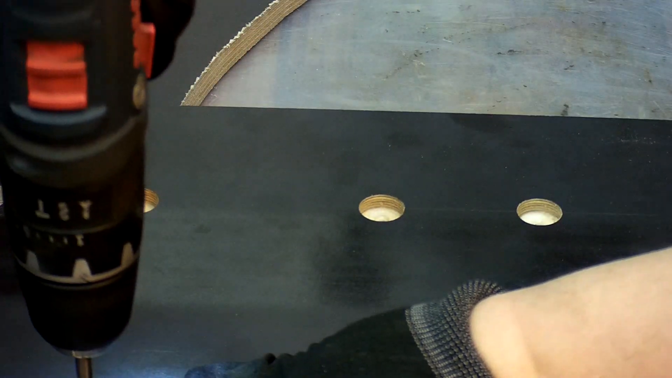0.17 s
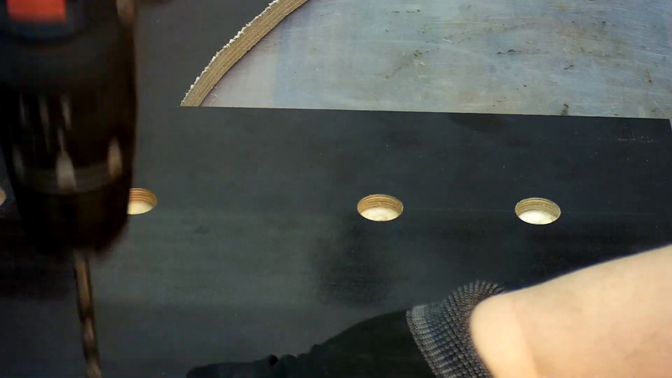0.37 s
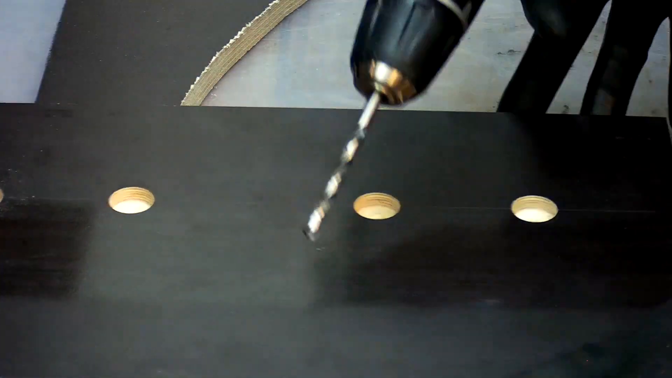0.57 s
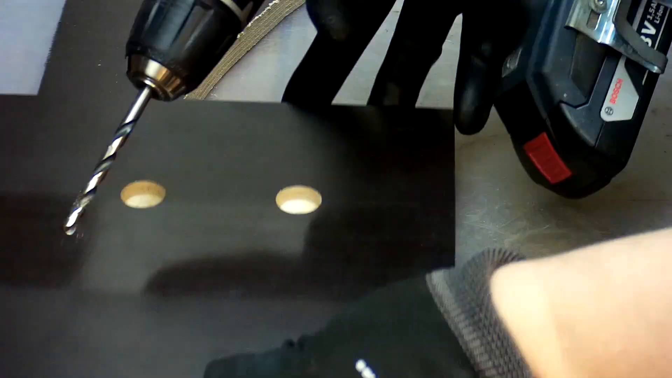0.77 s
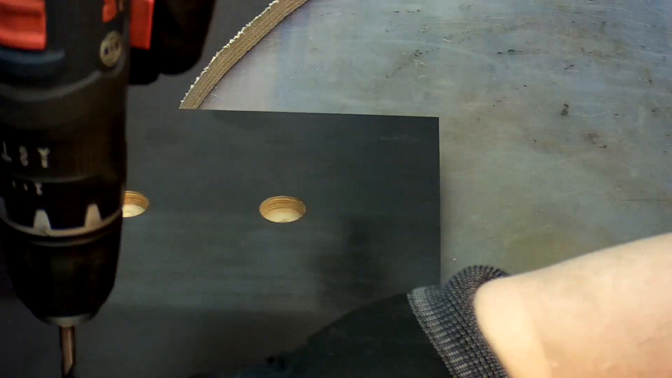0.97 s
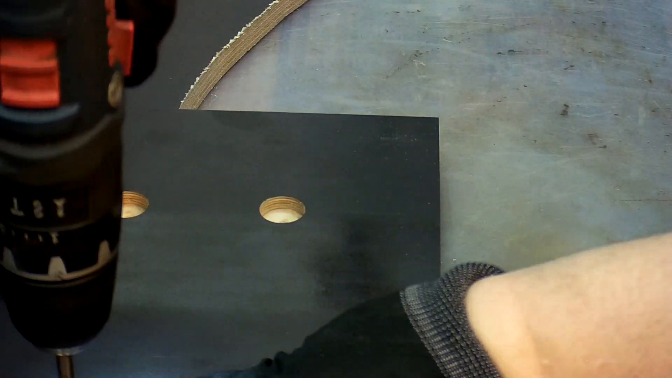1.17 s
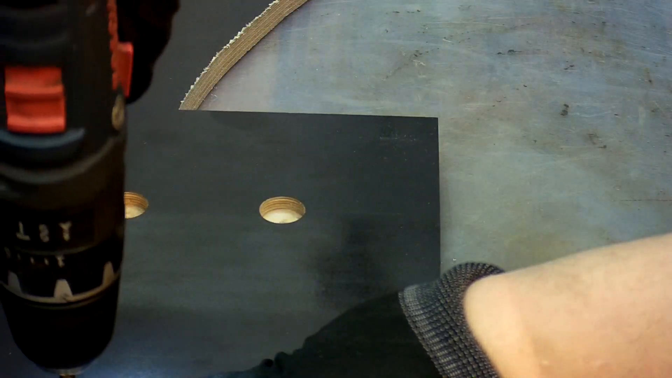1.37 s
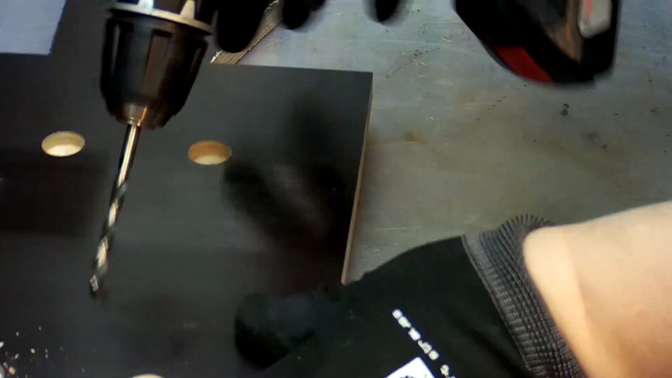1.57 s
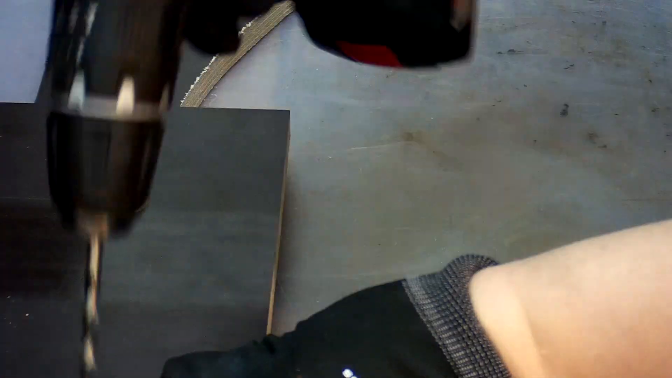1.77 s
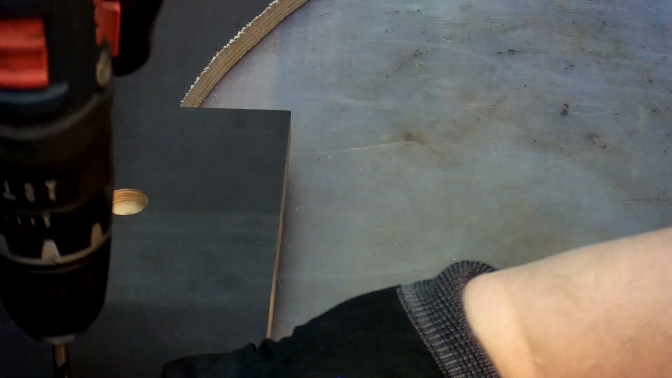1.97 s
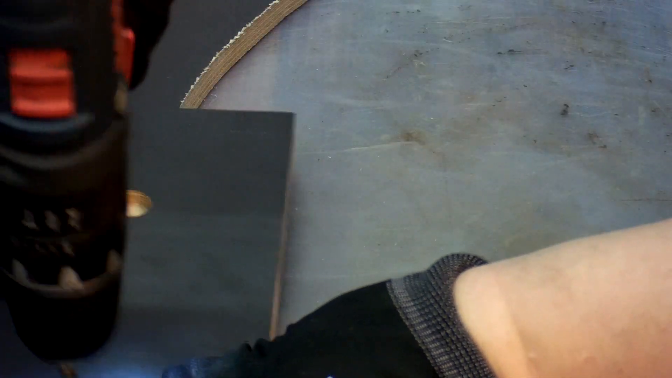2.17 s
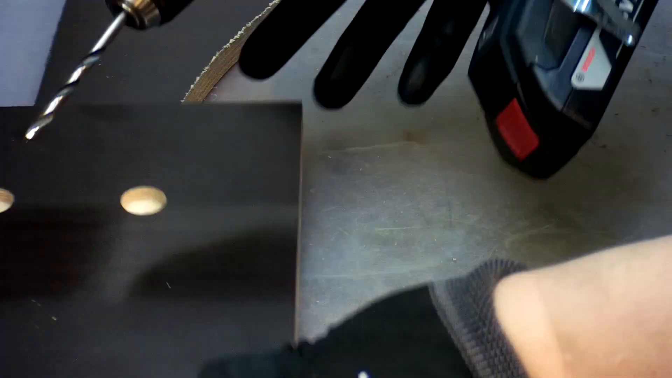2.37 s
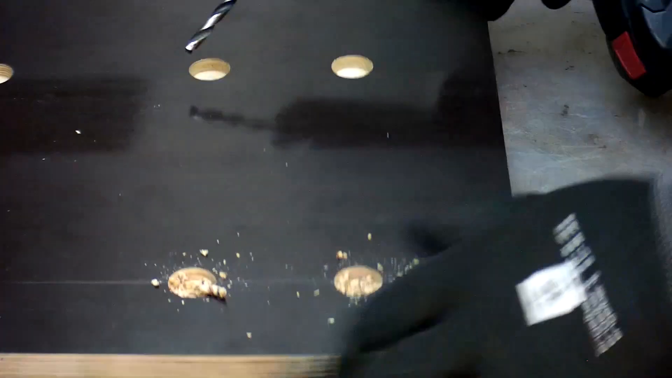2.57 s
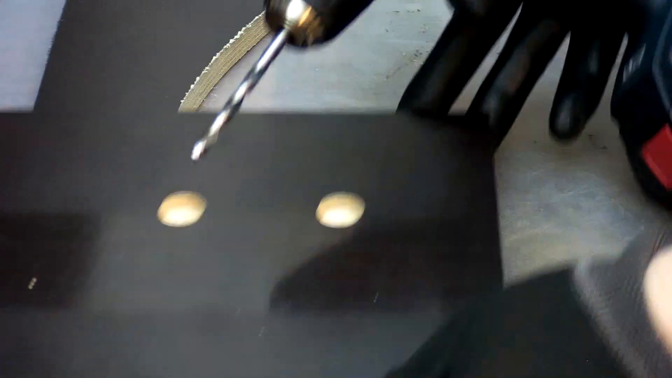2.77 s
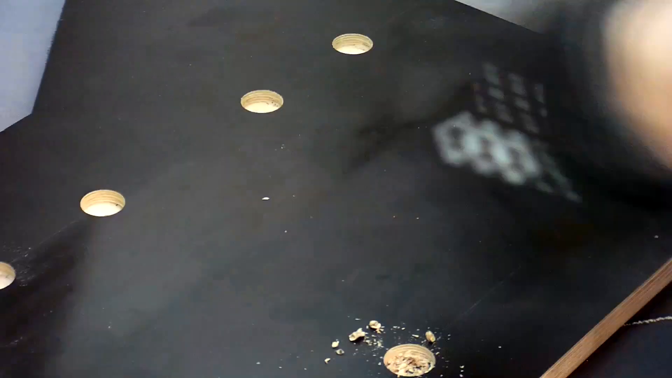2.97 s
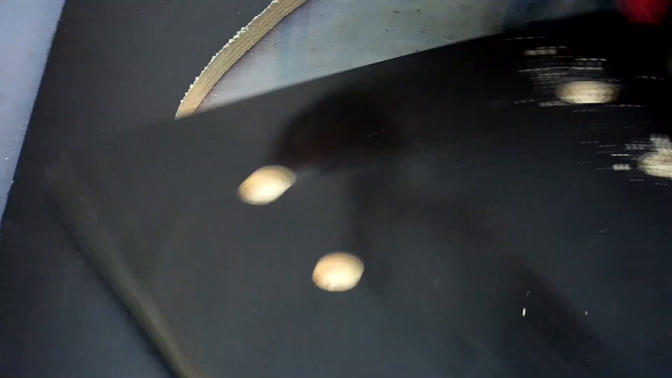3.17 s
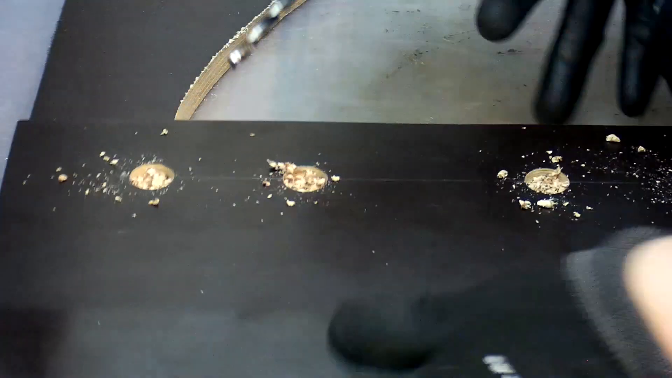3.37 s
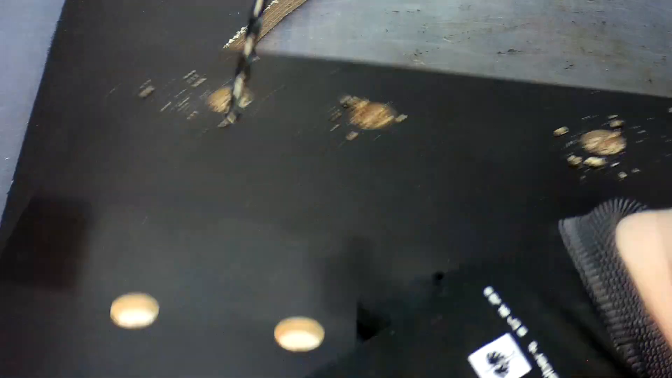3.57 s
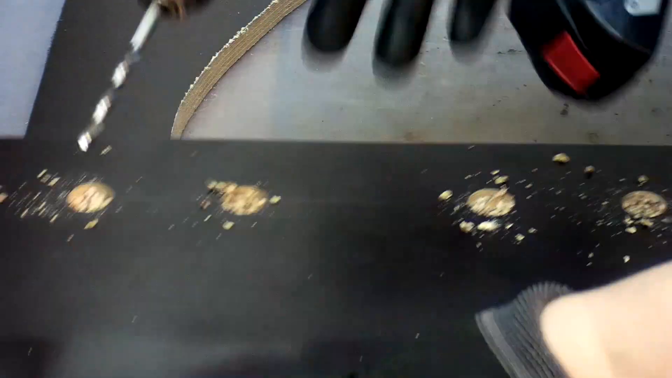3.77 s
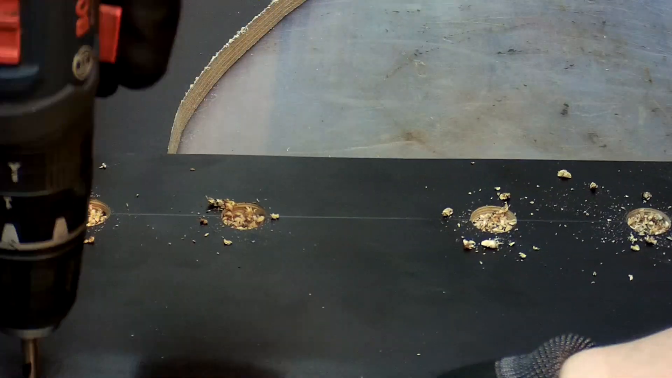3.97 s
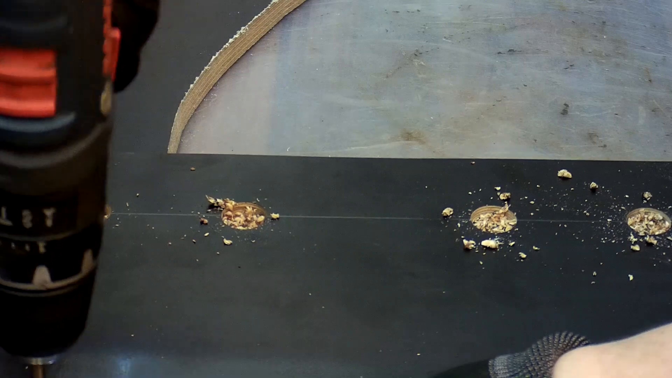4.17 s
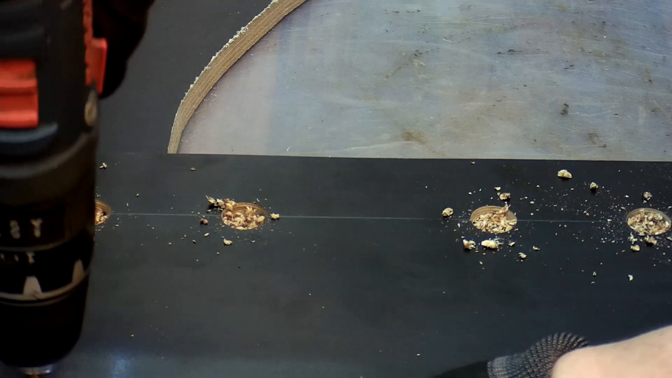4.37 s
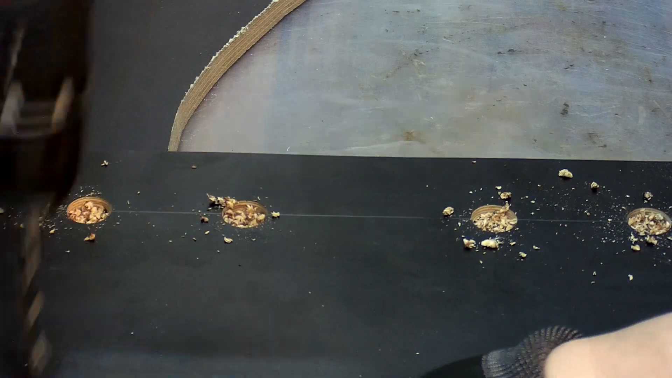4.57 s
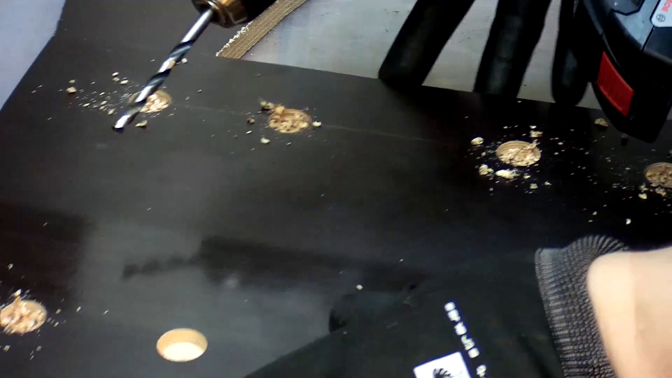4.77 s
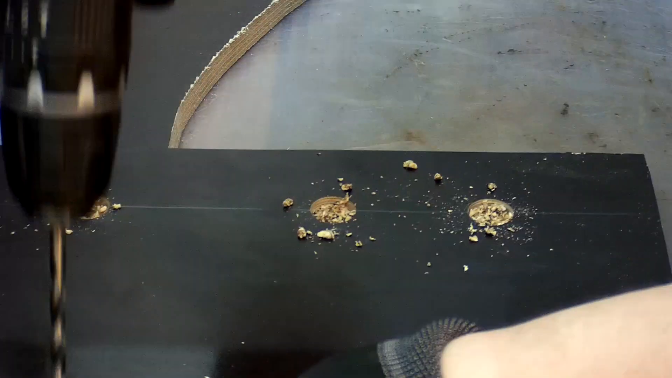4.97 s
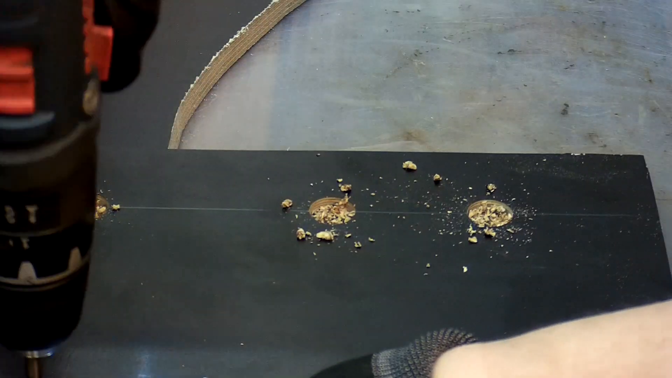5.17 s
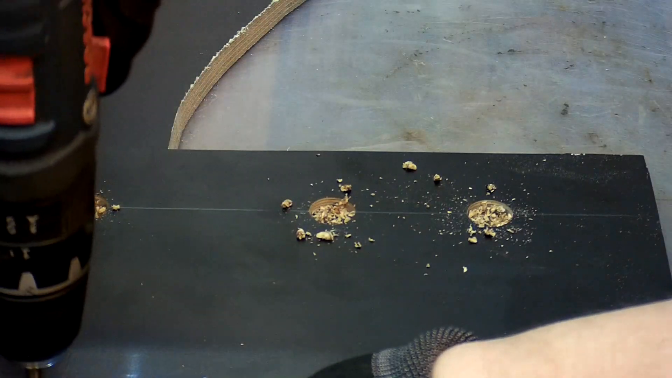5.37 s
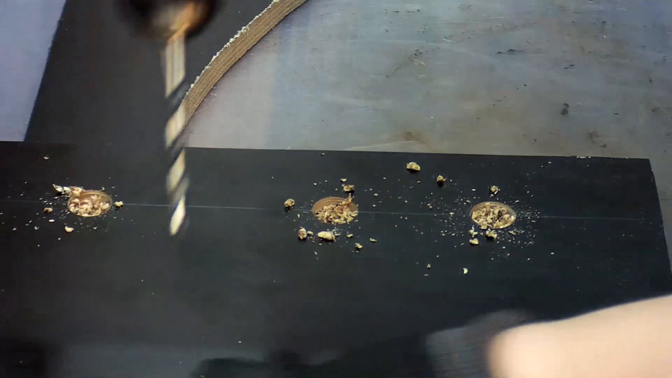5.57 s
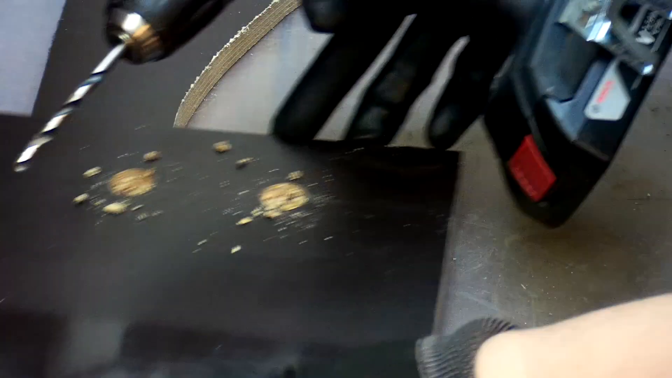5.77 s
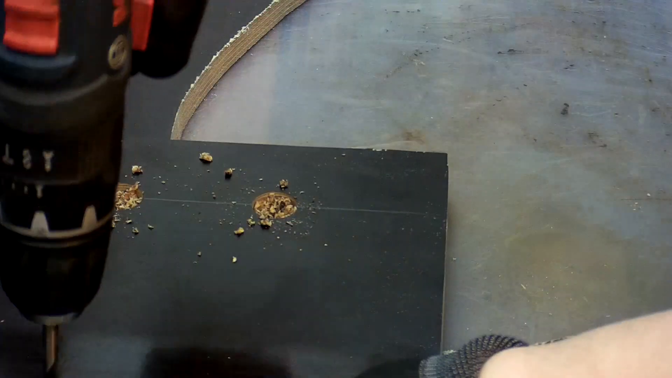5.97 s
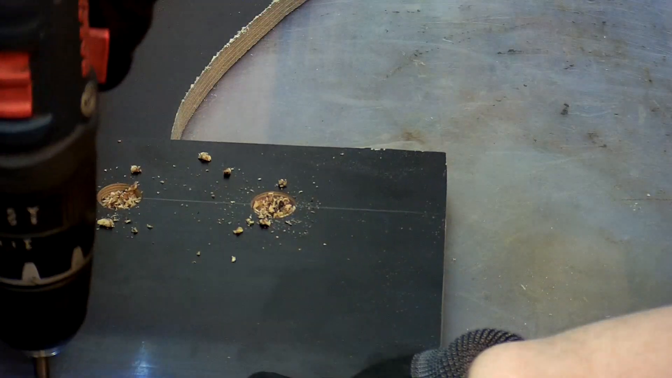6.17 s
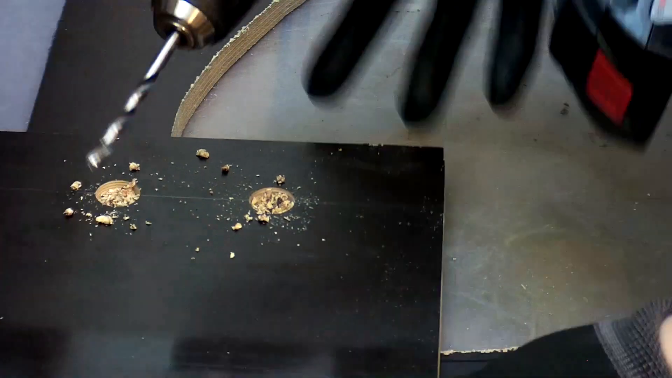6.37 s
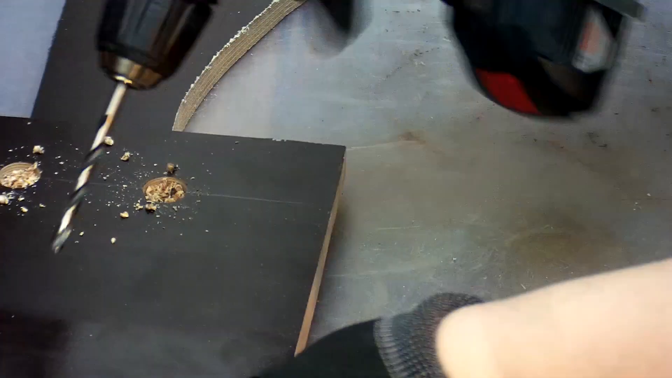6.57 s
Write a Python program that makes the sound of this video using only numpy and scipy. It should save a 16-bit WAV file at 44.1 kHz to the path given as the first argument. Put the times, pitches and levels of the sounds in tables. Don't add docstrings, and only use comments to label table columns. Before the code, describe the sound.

A cordless drill bores six holes in plywood in short whining, crackling bursts, with gloved rustles, board scrapes and bumps between, ending on a hard knock.

```python
import sys
import numpy as np
from scipy import signal
from scipy.fft import rfft, irfft, next_fast_len
from scipy.io import wavfile
from scipy.ndimage import uniform_filter1d, map_coordinates

SR = 44100
rng = np.random.default_rng(int(sys.argv[2]) if len(sys.argv) > 2 else 0)


def amplitude_ratio(level_db):
    exponent = np.asarray(level_db, float) / 20
    return 10 ** exponent


def materialize(psi):
    bounded = np.clip(np.atleast_2d(psi).T, -1, 1)
    quanta = np.round(bounded * 32767).astype(np.int16)
    wavfile.write(sys.argv[1], SR, quanta)


N = 295470


def unit(x):
    return x / np.sqrt(np.mean(x ** 2) + 1e-20)


def along(points, hz):
    f, value = np.transpose(points)
    return np.interp(np.log(hz + 1), np.log(f + 1), value)


def wobble(rate, count=N):
    knots = rng.standard_normal(int(count * rate / SR) + 4)
    return map_coordinates(knots, [np.arange(count) * rate / SR], order=1)


def filtered(x, response):
    m = next_fast_len(N + SR // 2)
    return irfft(rfft(x, m) * response(np.fft.rfftfreq(m, 1 / SR)), m)[..., :N]


def modes(table):
    def response(f):
        total = 0
        for k, (centre, width, db) in enumerate(table):
            damped = 1j * f * width
            total = total + (-1) ** k * amplitude_ratio(db) * damped / (centre * centre - f * f + damped)
        return total
    return response


def grit(spread_db, patchy_db):
    force = rng.standard_normal(N) * amplitude_ratio(spread_db * wobble(1500))
    z = signal.stft(force, nperseg=256)[2]
    streaks = uniform_filter1d(rng.standard_normal(z.shape), size=2, axis=0)
    streaks = uniform_filter1d(streaks, size=14, axis=1)
    return unit(signal.istft(z * amplitude_ratio(patchy_db * unit(streaks)), nperseg=256)[1][:N])


def coloured(x, spectrum):
    closed = [(spectrum[0][0] / 2, -120)] + list(spectrum) + [(17000, -120)]
    return unit(filtered(x, lambda hz: amplitude_ratio(along(closed, hz))))


def singing(x, hz, width_hz):
    return unit(signal.lfilter(*signal.iirpeak(hz, hz / width_hz, SR), x))


# f/Hz, level/dB per Hz
AIR = [(15, -48), (25, -11.5), (184, -6.5), (268, -7), (351, -3.5), (380, -5.5), (413, -4), (498, -5),
       (746, -5), (1120, -7), (1460, -9.5), (1770, -10.5), (15700, -28.5)]


def still_air():
    return amplitude_ratio(-67 + 0.33 * wobble(2.37)) * coloured(rng.standard_normal(N), AIR)


def trigger(start, spin_s, entry_db, stop, stop_db_per_s):
    onset_db_per_s, stop_knee_s = 1450, 0.018
    t = np.arange(0, N + 32, 32) / SR
    climb = entry_db * np.exp(-np.maximum(t - start, 0) / spin_s)
    climb = climb - onset_db_per_s * np.maximum(start - t, 0)
    level_db = climb - stop_db_per_s * stop_knee_s * np.logaddexp(0, (t - stop) / stop_knee_s)
    return np.interp(np.arange(N) / SR, t, level_db)


# start t/s, spin-up t/s, entry level/dB re full, stop t/s, full hiss level/dB
HOLES = [
    (0.016, 0.062, -14.202, 0.427, -45.288),
    (1.124, 0.051, -23.328, 1.493, -41.753),
    (2.05, 0.042, -7.961, 2.32, -43.101),
    (4.171, 0.074, -26.318, 4.627, -44.478),
    (5.212, 0.131, -15.882, 5.589, -43.25),
    (6.095, 0.07, -12.268, 6.336, -39.46),
]
# f/Hz, width f/Hz, level/dB
BOARD = [(350, 370, -17.5), (609, 62, -8), (759.3, 22.7, 3.5), (1017, 25.7, 0), (1320, 37, -4.5),
         (1672, 87, -4), (2190, 95, -2), (2475, 99, -4), (2700, 580, -20), (3290, 130, -11.5),
         (3880, 100, -5), (4650, 230, -41)]
# f/Hz, level/dB per Hz
HISS = [(710, -33), (1200, -6), (1340, -9.5), (1490, -14.5), (1700, -1), (3060, -8.5), (3200, -0.5),
        (3450, -6), (4150, -2.5), (5690, -7.5), (6210, -4.5), (15200, -7.5), (16200, -1)]


def boring():
    chips_lead_s, breakout_s = 0.0019, 0.019
    hiss_gain, chips_gain = np.zeros(N), np.zeros(N)
    for start, spin_s, entry_db, stop, full_db in HOLES:
        hiss_gain += amplitude_ratio(full_db + trigger(start, spin_s, entry_db, stop, stop_db_per_s=2080))
        chips_pull_db = trigger(start - chips_lead_s, spin_s, 0.21 * entry_db, stop - breakout_s,
                                stop_db_per_s=1500)
        chips_gain += amplitude_ratio(full_db + chips_pull_db)
    hiss = hiss_gain * amplitude_ratio(1.5 + 1.37 * wobble(60)) * coloured(grit(spread_db=1.5, patchy_db=2.5), HISS)
    jolts = chips_gain * amplitude_ratio(-3.5 + 0.32 * wobble(70)) * grit(spread_db=6.5, patchy_db=3.0)
    return hiss + amplitude_ratio(10.5) * filtered(jolts, modes(BOARD))


# f/Hz, width f/Hz, level/dB
CHUCK = [(3600, 1050, -2.5), (6640, 640, -0.5), (8700, 1300, -3), (11200, 1700, -5.5)]


def blows(rows, tick_hz, t60, damping):
    force, t = np.zeros((3, N + SR)), np.arange(SR // 10) / SR
    for s, db, thud_db, tick_db in rows:
        crunch = amplitude_ratio(-60 * t / max(t60, .004)) * rng.standard_normal((3, len(t)))
        crunch[:, 0] = [11, 6, 2.5]
        crunch[2] = 0.19 * crunch[2] + signal.lfilter(*signal.iirpeak(tick_hz, 2.5, SR), crunch[2])
        thud_rap_tick = amplitude_ratio([[thud_db + 24.0], [14], [tick_db + 14]])
        force[:, round(s * SR):][:, :len(t)] += amplitude_ratio(db) * thud_rap_tick * crunch
    held = [(hz, damping * width, db - 14 * np.log10(damping)) for hz, width, db in BOARD]
    thud, rap, tick = modes(held[:5]), modes(held[5:9]), modes(CHUCK)
    return filtered(force[:, :N], lambda f: np.array([thud(f), rap(f), tick(f)])).sum(axis=0)


# t/s, peak level/dB, thud and tick level/dB re peak
BITES = [(0.015, -35, -16.5, -16), (0.381, -30, -14, -21), (1.1, -46, -2, -22), (1.136, -26, -23.5, -12.5),
         (1.442, -29.5, -15, -8), (2.031, -48, -2.5, -20), (2.048, -22, -26, -16.5), (2.2265, -27, -7, -6),
         (2.276, -33, -11.5, -22), (4.16, -57, -1, -16), (4.18, -39, -15, -14), (4.574, -46, -4, -17),
         (5.199, -53.5, 1, -21), (5.455, -28, -15, -6), (5.544, -42.5, -4, -12), (6.077, -53.5, -2, -18),
         (6.095, -21.5, -27, -16.5), (6.111, -39, -21, 5), (6.307, -27, -17.5, -14), (6.319, -42.5, -32, 6)]


def bites():
    return blows(BITES, tick_hz=3800, t60=0.015, damping=1.5)


# f/Hz, t60 t/s
WALLS = [(300, 0.12), (2000, 0.065), (10000, 0.025)]


def workshop(x):
    hz, t, z = signal.stft(rng.standard_normal(SR // 4), SR, nperseg=128)
    tail = signal.istft(z * amplitude_ratio(-60 * t / along(WALLS, hz)[:, None]), SR, nperseg=128)[1]
    first_echo = 130
    return signal.fftconvolve(np.pad(x, (first_echo, 0)), tail / np.linalg.norm(tail))[:N]


# t/s, mesh f/Hz, mesh level/dB
GEAR_RUNS = [
    [(0.05, 2680, -79), (0.075, 2840, -69), (0.105, 2870, -79), (0.14, 2700, -57), (0.21, 2650, -61),
     (0.3, 2610, -60), (0.37, 2700, -61), (0.405, 3110, -51), (0.422, 3180, -73)],
    [(1.172, 3200, -52), (1.195, 3800, -47), (1.25, 3580, -44), (1.28, 3613, -46), (1.314, 3466, -45),
     (1.354, 3530, -45), (1.415, 3370, -46.5), (1.465, 3900, -43.5), (1.487, 3800, -59)],
    [(2.055, 3500, -55), (2.086, 4030, -42.5), (2.138, 3794, -44), (2.163, 3920, -41), (2.193, 3800, -48),
     (2.212, 3840, -44), (2.235, 3430, -48), (2.283, 3956, -46), (2.315, 3960, -57.5)],
    [(4.266, 3460, -54), (4.276, 3845, -44.5), (4.292, 4058, -47), (4.452, 3767, -41), (4.478, 3893, -42.5),
     (4.536, 3790, -43.5), (4.562, 3905, -48), (4.606, 4150, -56), (4.612, 4080, -46)],
    [(5.255, 2737, -63), (5.282, 2850, -61), (5.297, 3227, -56), (5.46, 3120, -46), (5.474, 2980, -49),
     (5.5, 3120, -46.5), (5.535, 3046, -50.5), (5.57, 3520, -52.5), (5.585, 3600, -81)],
    [(6.115, 4420, -62), (6.14, 4397, -52), (6.17, 4290, -55), (6.23, 4124, -46), (6.245, 4180, -50),
     (6.28, 3990, -43), (6.305, 4015, -50), (6.318, 3970, -49), (6.33, 3960, -61)],]
RUN_MIX = [(-11, -2.5, -7, -12, -16), (-21.5, -29, -19, -18, -12), (-14.5, -22, -22, -19.5, -8),
           (-13, -30, -27, -18, -8), (-13.5, -22, -11.5, -13.5, -15), (-10, -18, -26, -9.5, -25)]
MESH_ORDERS = [5 / 3, 2, 3]
STAGE_ORDERS = [.78, 1.52, 2.295, 3.067, 3.267]
MESH_ORDER_DB = [-3, 0, 2]
STAGE_ORDER_DB = [3.5, -2, 0, 0, 3]


def gears():
    whine, time, sub_order = np.zeros(N), np.arange(N) / SR, 1 / 3
    for run, (sub_db, side_db, orders_db, stage_db, fourth_db) in zip(GEAR_RUNS, RUN_MIX):
        s, run_hz, run_db = np.transpose(run)
        on = slice(round(s[0] * SR), round(s[-1] * SR))
        running = (time >= s[0]) & (time < s[-1])
        gate = uniform_filter1d(running.astype(float), size=180)[on]
        hz, mesh_db = np.interp(time[on], s, run_hz), np.interp(time[on], s, run_db)

        def shake(rate):
            return wobble(rate, count=len(hz))

        turn = 2 * np.pi * np.cumsum(hz * (1 + 0.0021 * shake(90))) / SR

        def line(k, db, flutter_db):
            return amplitude_ratio(db + flutter_db * shake(60)) * np.sin(k * turn + .3 * k * shake(300))

        mesh = amplitude_ratio(2.0 * shake(62.2)) * np.sin(turn)
        locked = line(sub_order, sub_db, flutter_db=4.5) + line(4, fourth_db, flutter_db=4.5)
        orders = line(1 + sub_order, side_db, flutter_db=7.0)
        for k, db in zip(MESH_ORDERS, MESH_ORDER_DB):
            orders = orders + line(k, orders_db + db, flutter_db=7.0)
        for k, db in zip(STAGE_ORDERS, STAGE_ORDER_DB):
            orders = orders + line(k, stage_db + db, flutter_db=4.5)
        evening = amplitude_ratio(0.35 * np.minimum(np.median(mesh_db) - mesh_db, 6))
        whine[on] = np.sqrt(2) * gate * amplitude_ratio(mesh_db) * (mesh + locked + evening * orders)
    return whine


# t/s, peak level/dB
SNAPS = [(0.59, -57.5), (1.122, -70), (1.476, -47), (1.62, -48.5), (3.265, -62), (3.577, -59), (4.606, -43),
         (4.99, -72)]


def snaps():
    rows = [(s, db - 9, -12, 12) for s, db in SNAPS]
    return blows(rows, tick_hz=10900, t60=0.013, damping=1.5)


# start t/s, peak t/s, end t/s, rustle level/dB, scrape f/Hz
SHIFTS = [(0.618, 0.671, 0.728, -55.7, 3650), (0.719, 0.791, 0.859, -60.3, 3900),
          (1.545, 1.623, 1.659, -55.7, 3930), (1.672, 1.717, 1.779, -59.6, 3910),
          (1.844, 1.85, 1.874, -70.3, 2411), (2.409, 2.431, 2.466, -67.1, 2140),
          (2.46, 2.512, 2.582, -44.8, 3760), (2.581, 2.59, 2.629, -50.9, 3530),
          (2.624, 2.63, 2.658, -65.1, 3600), (2.747, 2.821, 2.86, -51.6, 3900),
          (4.682, 4.731, 4.777, -61.5, 2067), (4.808, 4.865, 4.893, -64.1, 2770),
          (4.861, 4.929, 4.965, -67.5, 2050), (5.663, 5.693, 5.742, -52.2, 3100),
          (5.743, 5.799, 5.852, -54.4, 4565), (6.424, 6.452, 6.521, -52.3, 3860),
          (6.505, 6.55, 6.592, -51.5, 3920)]
# start t/s, peak t/s, end t/s, rustle level/dB, scrape f/Hz
TURN = [(2.874, 2.882, 2.93, -47, 4430), (2.88, 2.935, 2.958, -43.5, 2300), (2.93, 2.965, 3.022, -51, 2670),
        (3.078, 3.099, 3.122, -58.0, 3130), (3.13, 3.215, 3.25, -47.5, 2790),
        (3.245, 3.325, 3.395, -53.1, 3040), (3.402, 3.446, 3.486, -63.1, 3580),
        (3.498, 3.531, 3.56, -56.0, 3273), (3.565, 3.593, 3.654, -56.2, 3060),
        (3.712, 3.771, 3.804, -60.2, 3130), (3.798, 3.824, 3.853, -64.1, 3186)]
# f/Hz, level/dB per Hz
RUSTLE = [(2650, -54), (4500, -17), (5520, -0.5), (6980, -3), (8200, -0.5), (9430, 2.5), (11100, 1),
          (12100, -10), (13300, -6), (15200, 1), (16200, -21)]
# f/Hz, width f/Hz, level/dB
SCRAPE = [(2310, 1500, 6), (3320, 660, 12), (4450, 2350, 4)]


def slides():
    out = np.zeros(N)
    force = grit(spread_db=2.0, patchy_db=2.0)
    rustle = coloured(grit(spread_db=2.5, patchy_db=1.8), RUSTLE)
    scrape = unit(filtered(grit(spread_db=3, patchy_db=3), modes(SCRAPE)))
    drag = unit(filtered(grit(spread_db=4.5, patchy_db=4.5), modes(BOARD[1:6])))
    for start, peak, end, db, hz in list(SHIFTS) + list(TURN):
        on = slice(round((start - .03) * SR), round((end + .03) * SR))
        t = np.arange(on.start, on.stop) / SR - peak
        reach = np.where(t < 0, -t / (peak - start), t / (end - peak)).clip(0)
        stroke_db = db - 1.5 - 28.5 * reach ** 3.02
        note_db = -6.5 + 2 * np.exp(-((hz - 3860) / 170) ** 2)
        note = singing(force[on], hz, width_hz=130)
        rub = scrape[on] + amplitude_ratio(note_db + 2.2 * wobble(70, count=len(t))) * note
        sheen = .35 * singing(force[on], min(3.02 * hz, 14000), width_hz=1100)
        scrape_db = -2 - 4.5 * np.log2(hz / 3000)
        out[on] += amplitude_ratio(stroke_db) * (1.007 * rustle[on] + sheen + amplitude_ratio(scrape_db) * rub)
        drag_db = -9 - 56.5 + 0.53 * (stroke_db + 55.5) + 0.25 * (stroke_db - db)
        out[on] += amplitude_ratio(drag_db) * drag[on]
    return out


# t/s, level/dB, f/Hz, length t/s
CATCHES = [(0.66, -61, 1300, .015), (0.663, -69, 1810, .03), (2.502, -57.5, 745, 0.05),
           (2.528, -54, 1090, 0.044), (2.545, -50, 1780, 0.024), (2.893, -47, 4450, 0.019),
           (2.915, -45.5, 2520, 0.011), (2.93, -55, 2450, 0.011), (2.941, -43, 2100, .012),
           (3.165, -54, 2800, 0.016), (3.175, -54.5, 2130, .012), (3.33, -58.5, 3500, 0.051),
           (3.363, -61, 2300, 0.018), (3.613, -61, 3040, .03), (3.767, -61, 2980, .03)]


def catches():
    out, force = np.zeros(N), amplitude_ratio(4 * wobble(1500)) * rng.standard_normal(N)
    for s, db, hz, length in CATCHES:
        on = slice(round((s - .06) * SR), round((s + .06) * SR))
        t = np.arange(on.start, on.stop) / SR - s
        swell = np.exp(-(t / max(length, .003)) ** 2 * 2)
        out[on] += amplitude_ratio(db) * swell * singing(force[on], hz, width_hz=150)
    return out


# t/s, peak level/dB, thud and tick level/dB re peak
BUMPS = [(0.966, -63.5, -2, -20), (1.546, -46, -15, -20), (1.62, -47, -7, -14), (1.849, -47.5, -7.5, -23),
         (1.942, -55, -14, -21), (2.426, -43.5, -7, -10), (2.586, -41.5, -7, -2), (2.629, -37, -14, -13),
         (2.704, -48.5, -16, -28), (2.8785, -35, -14, 2.5), (2.991, -32, -7, -20), (3.41, -45.5, -19, -10),
         (5.963, -60.5, -7, -10), (6.59, -25.5, -15, -14.5), (6.596, -30, -10.5, -9.5),
         (6.603, -35, -8, -9)]


def bumps():
    return blows(BUMPS, tick_hz=3800, t60=0.034, damping=3.5)


def scene():
    near = boring() + bites() + gears() + snaps() + slides() + catches() + bumps()
    near = filtered(near, lambda hz: (1j * hz / (150 + 1j * hz)) ** 2)
    mono = near + amplitude_ratio(-12) * workshop(near) + still_air()
    return np.array([mono, mono])


def roll_off(x):
    return signal.sosfilt(signal.butter(12, 16780, fs=SR, output="sos"), x)


def record(dry):
    top = [(15790, 0), (15880, -30), (16600, -34), (16800, -90)]  # f/Hz, level/dB
    return roll_off(filtered(dry, lambda hz: amplitude_ratio(along(top, hz))))


dry = scene()
out = record(dry)
materialize(out)
```